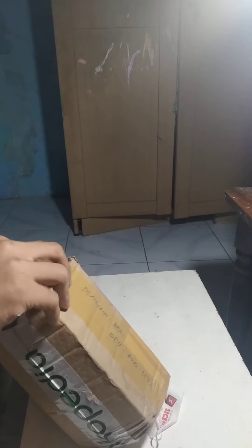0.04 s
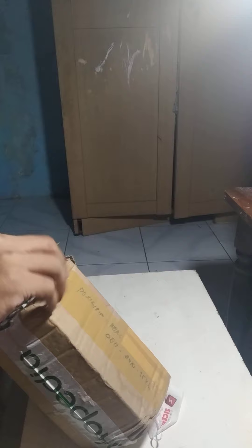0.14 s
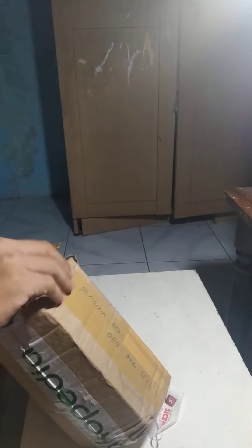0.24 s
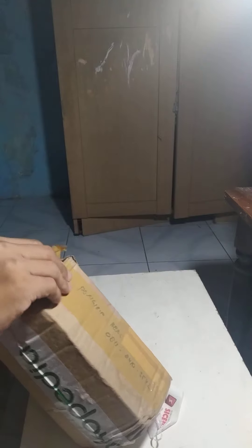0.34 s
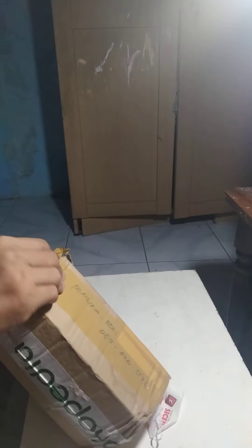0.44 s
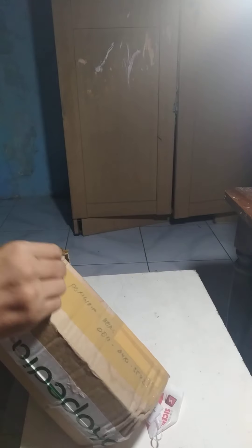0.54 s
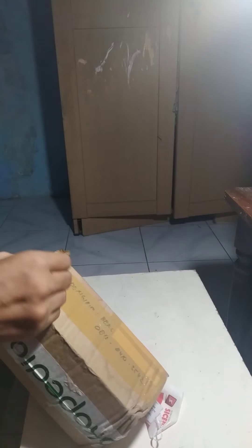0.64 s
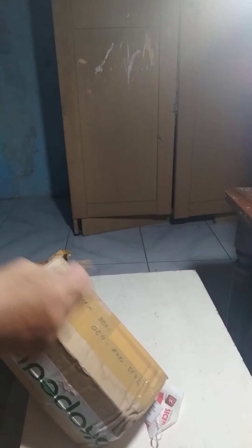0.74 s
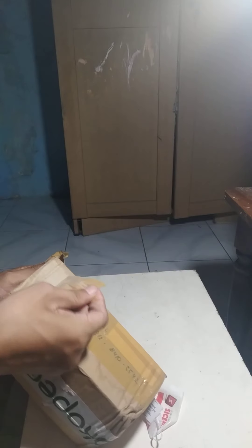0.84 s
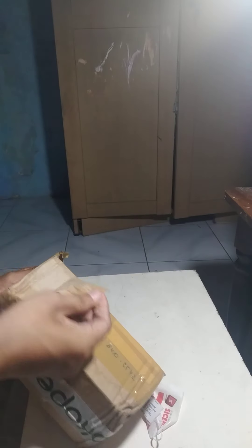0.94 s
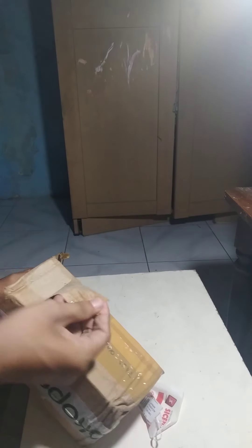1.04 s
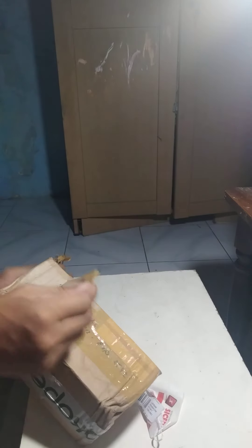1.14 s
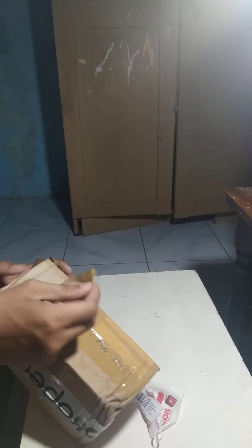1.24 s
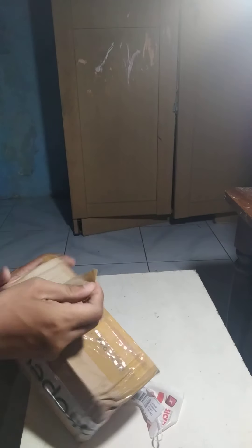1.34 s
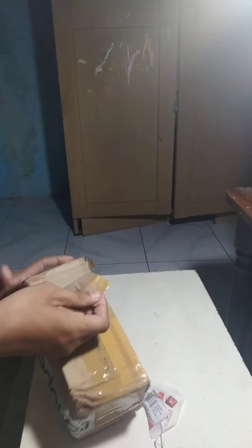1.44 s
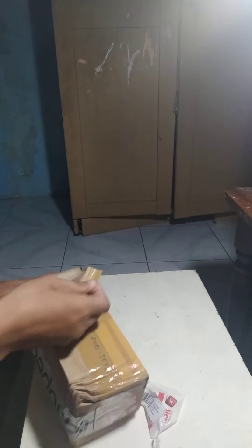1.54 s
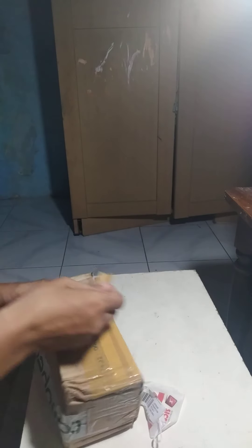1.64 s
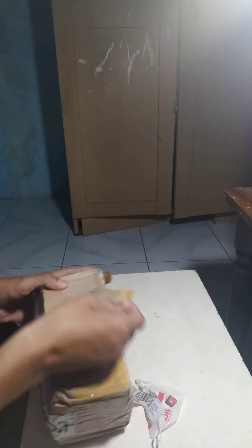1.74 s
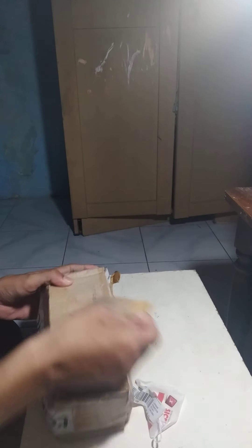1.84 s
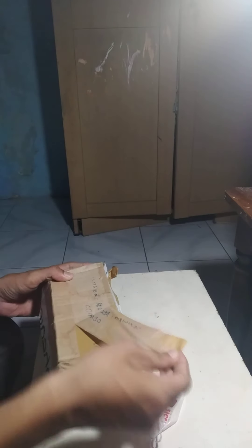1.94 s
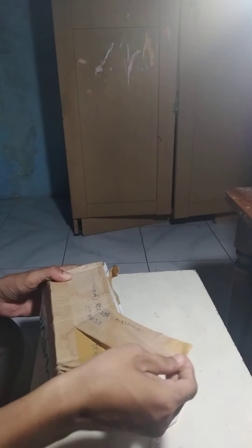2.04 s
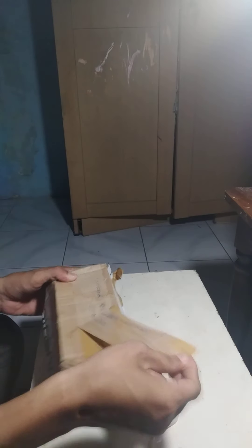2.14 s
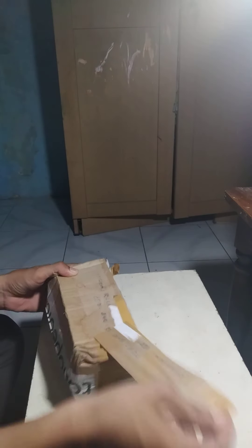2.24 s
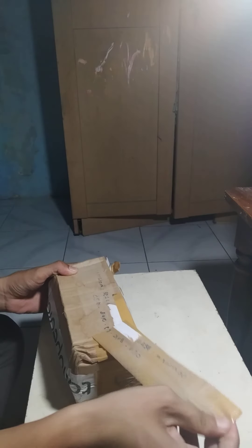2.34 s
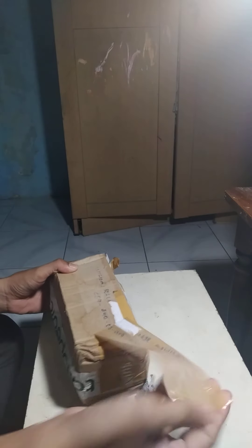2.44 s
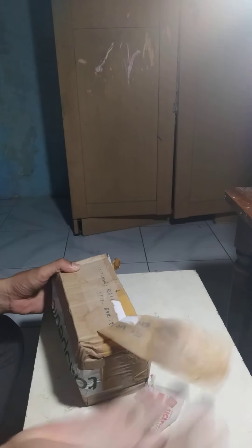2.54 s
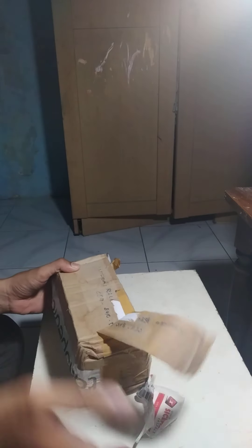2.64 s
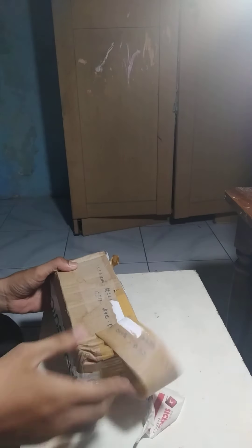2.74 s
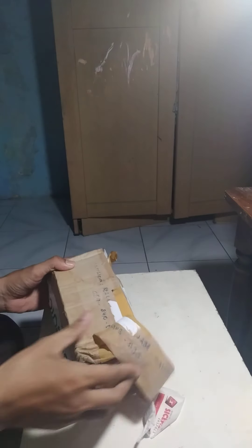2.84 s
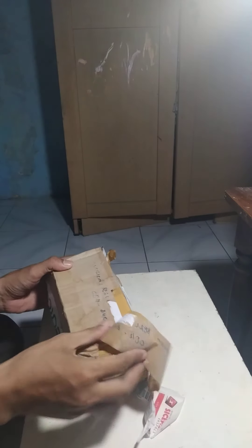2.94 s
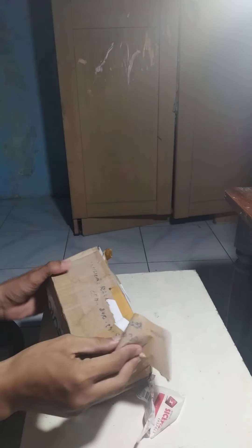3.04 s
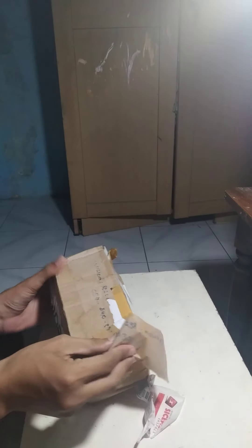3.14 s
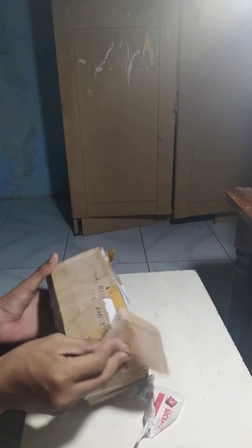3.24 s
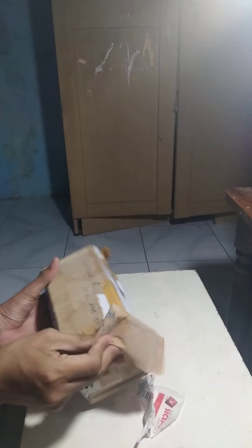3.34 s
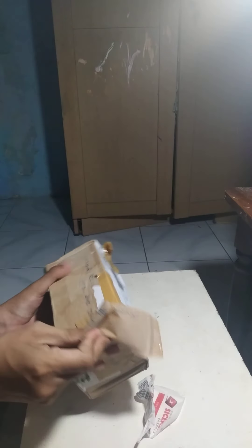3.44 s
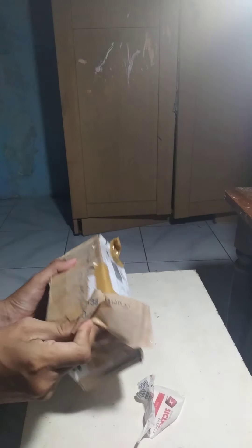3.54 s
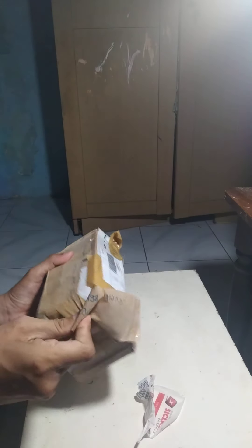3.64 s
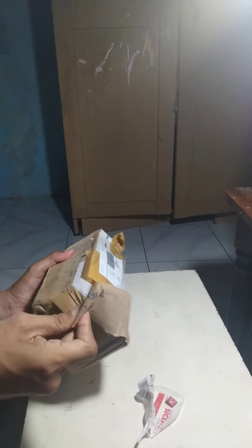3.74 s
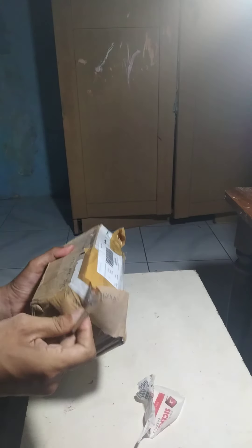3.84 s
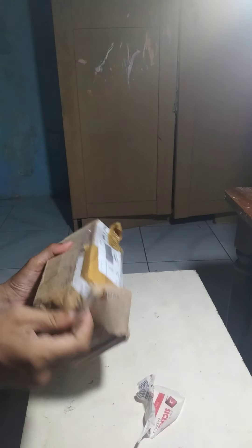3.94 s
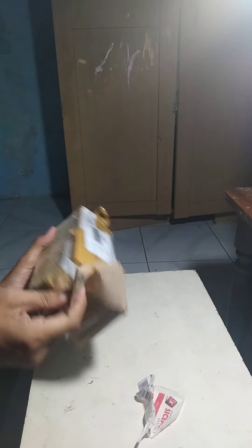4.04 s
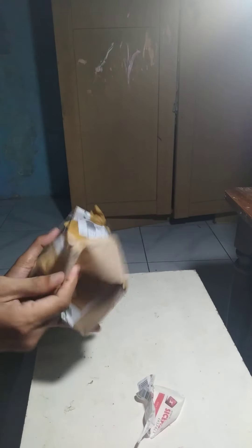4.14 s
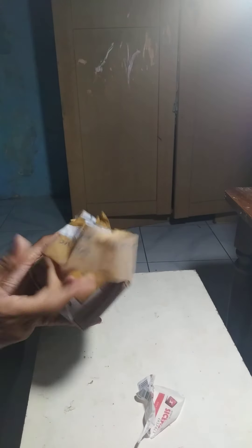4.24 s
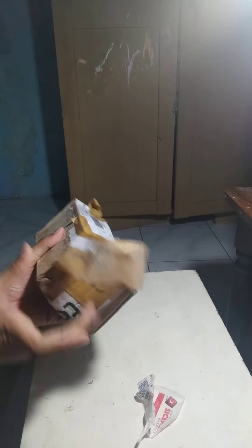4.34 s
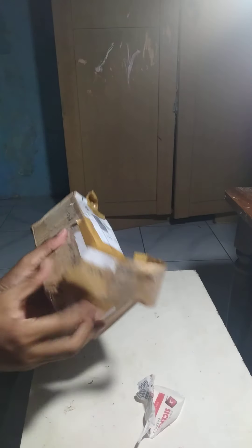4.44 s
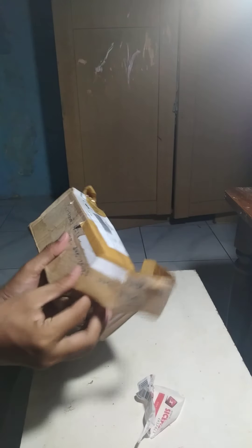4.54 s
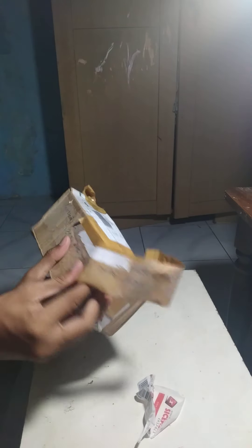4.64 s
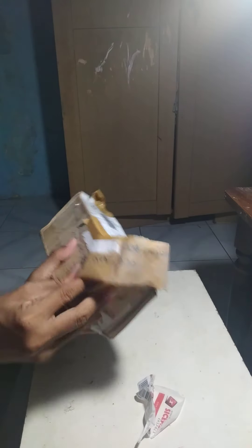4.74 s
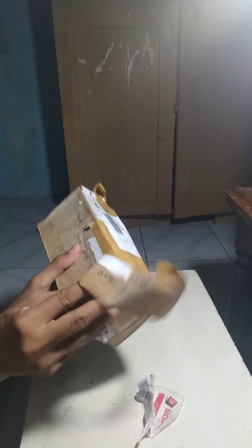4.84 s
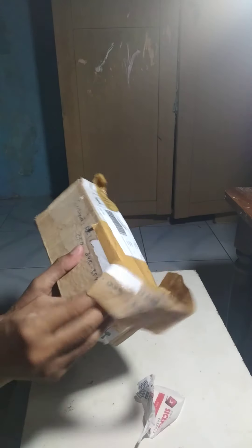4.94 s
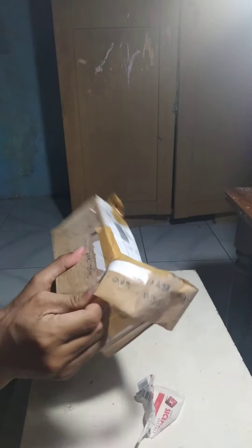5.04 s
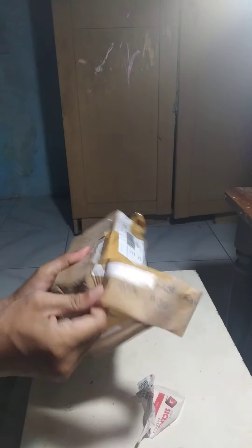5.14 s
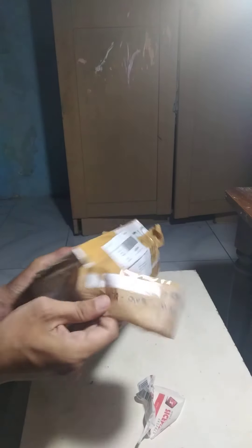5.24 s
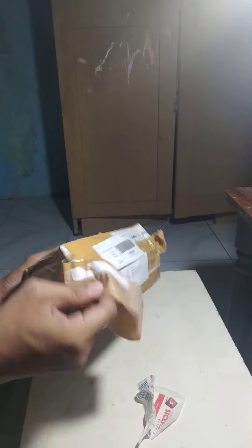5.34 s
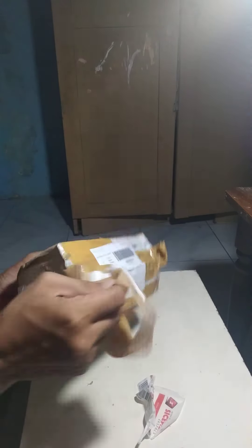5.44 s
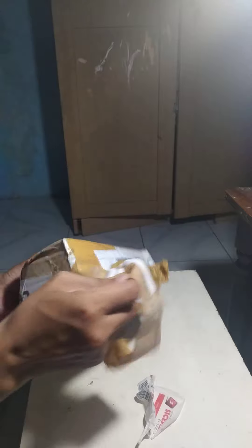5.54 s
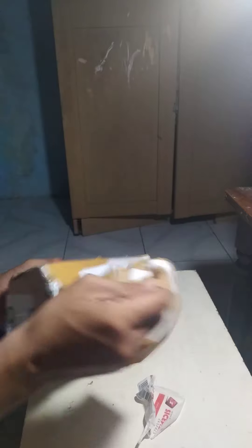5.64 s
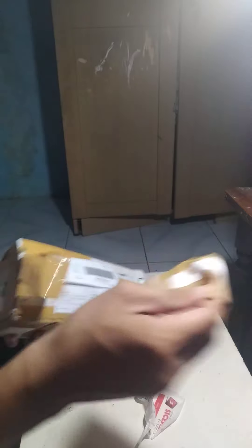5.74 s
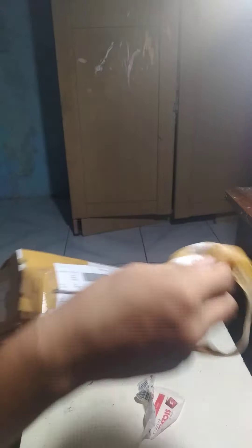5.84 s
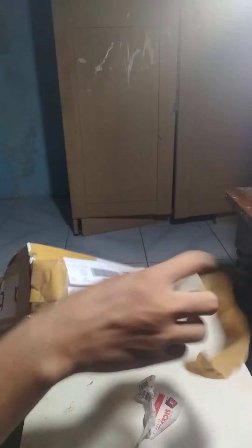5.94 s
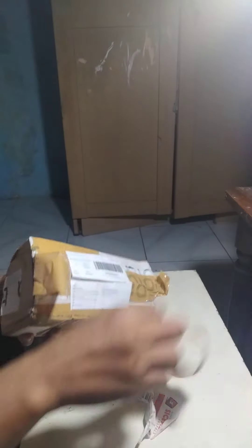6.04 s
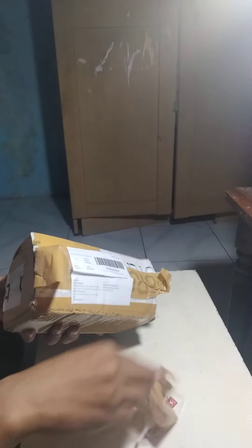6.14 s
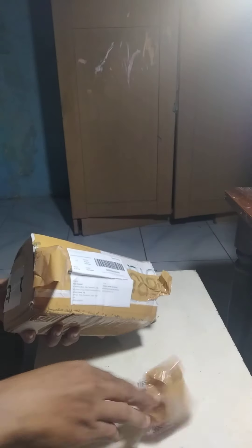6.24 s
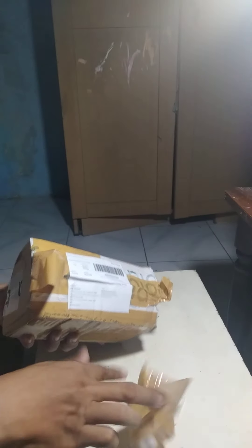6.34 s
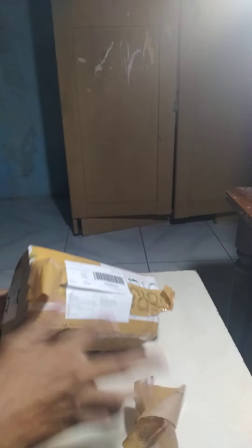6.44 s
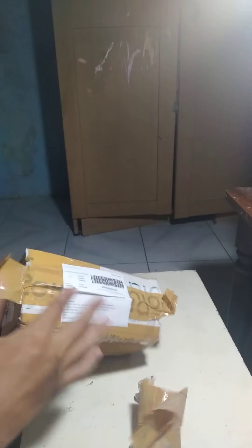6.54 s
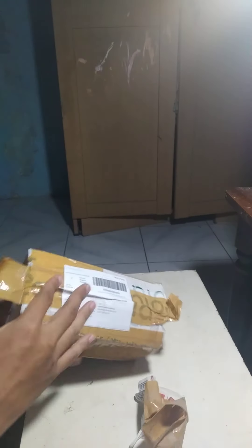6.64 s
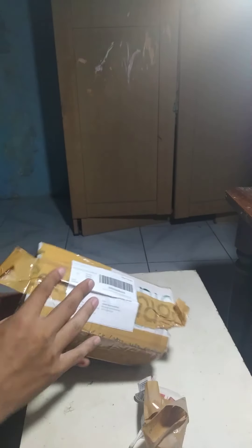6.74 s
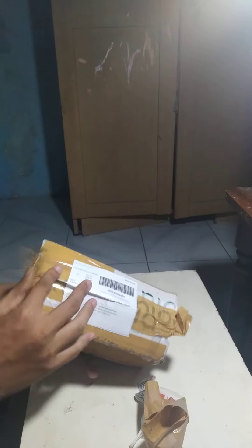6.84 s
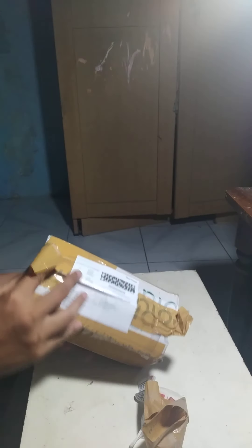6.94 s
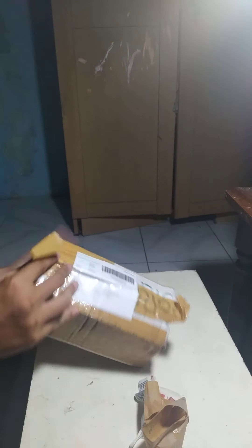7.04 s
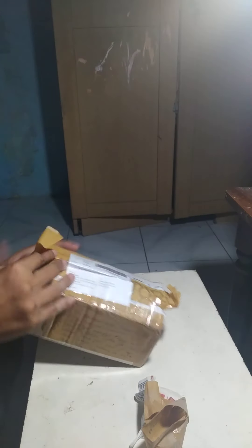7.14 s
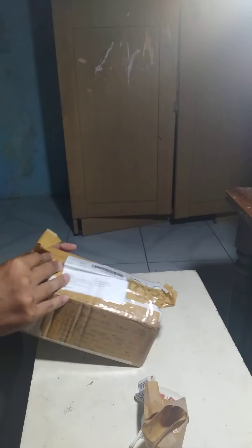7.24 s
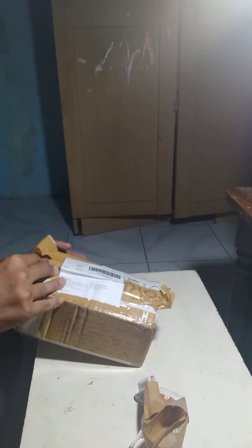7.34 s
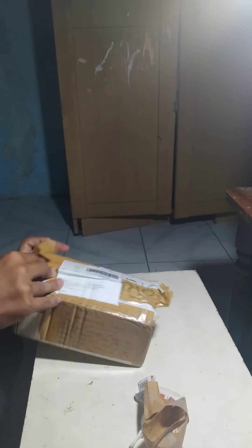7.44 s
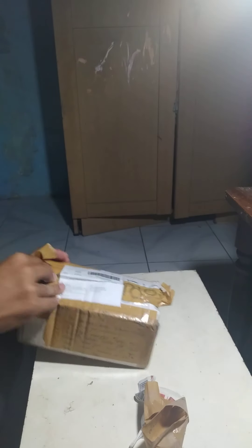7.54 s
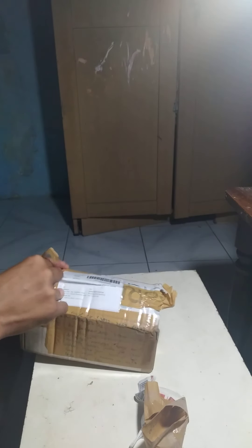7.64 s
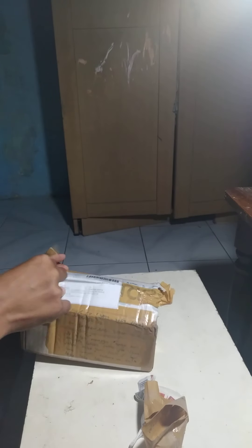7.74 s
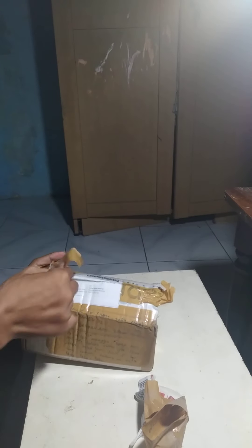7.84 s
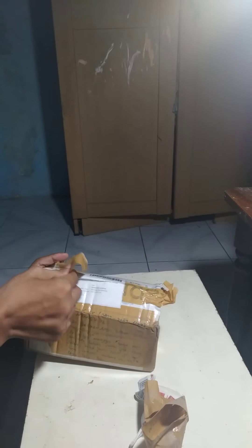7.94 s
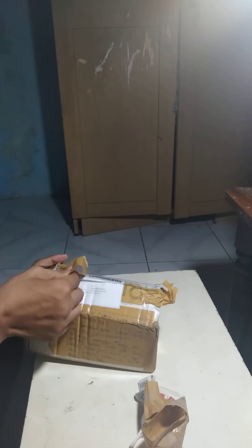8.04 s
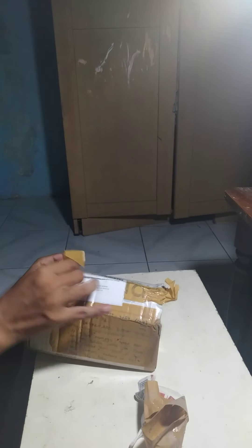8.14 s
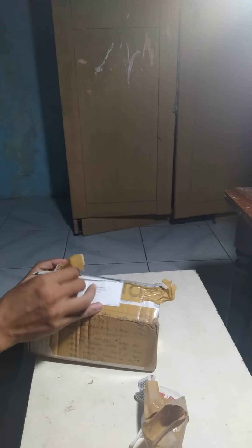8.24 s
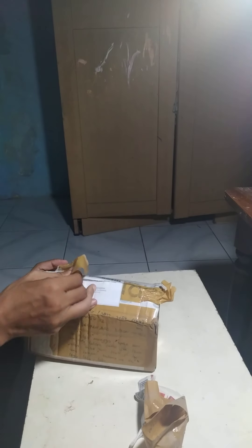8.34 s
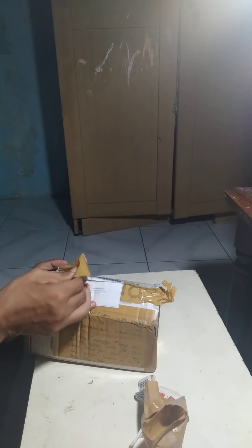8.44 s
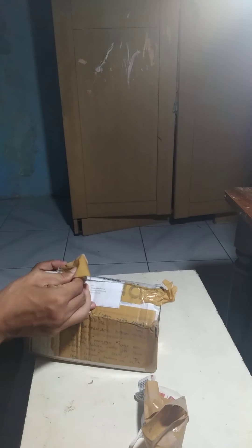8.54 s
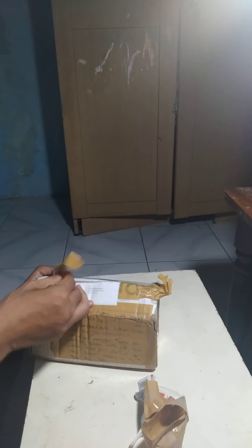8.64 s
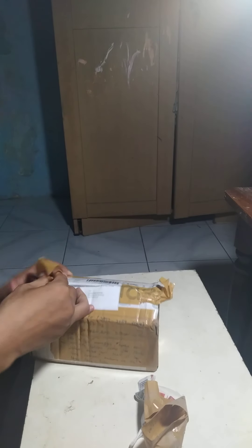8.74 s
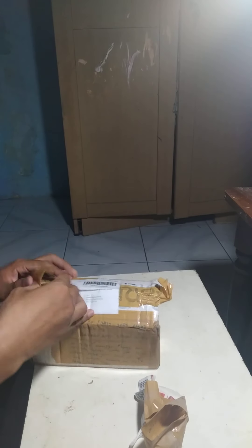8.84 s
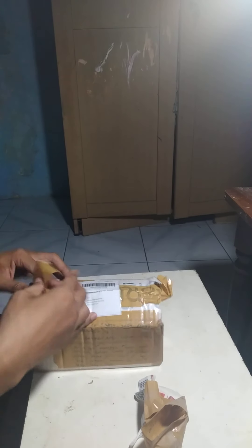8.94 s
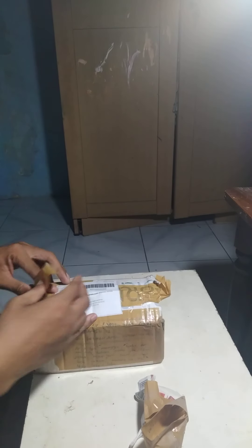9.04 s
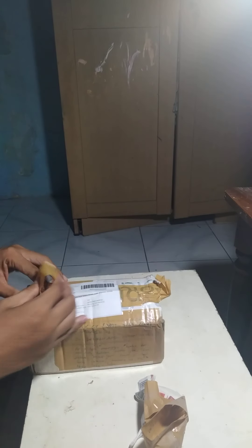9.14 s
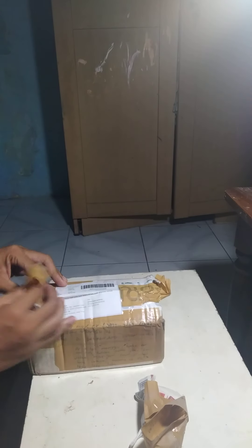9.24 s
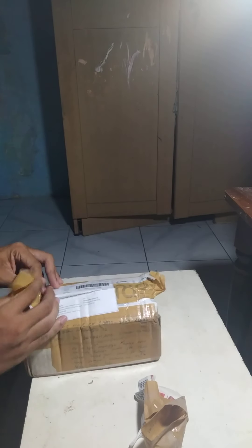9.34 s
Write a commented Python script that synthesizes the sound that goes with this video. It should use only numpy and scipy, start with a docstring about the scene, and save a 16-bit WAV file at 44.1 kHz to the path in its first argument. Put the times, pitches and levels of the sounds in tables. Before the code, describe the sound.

Close stereo phone pickup of tape peeling from a hollow box on a table. Three main bouts of dry, ragged ripping, the middle one loudest, are separated by soft skin rubs, plastic crinkles and fingertip knocks. Strong snaps crack brightly and kick the cardboard. Short room reflections, soft room noise and a faint wavering hum surround it.

```python
"""A fingertip knock on cardboard is heard first. Fingers rip packing tape off a box in several bouts,
knocking on it and fidgeting before, between and after. Place: a table in a small hard-walled room.
The glue gives way in quick uneven slips that crackle in the film and drum on the box; sudden snaps crack
in the film and kick the box, and jolts thud on the table. Noise bursts and impulses drive filters for box,
face and film, and the walls answer with decaying noise. Microphone: a phone with two ports, close by.
Soft room noise and a faint motor hum lie underneath."""
import sys
import numpy as np
from scipy import signal
from scipy.fft import rfft, irfft
from scipy.io import wavfile
from scipy.ndimage import uniform_filter1d

SR = 44100
rng = np.random.default_rng(int(sys.argv[2]) if len(sys.argv) > 2 else 0)


def wav_record(signal):
    """Record a signal, one row per channel, as 16-bit PCM in the file named by sys.argv[1]."""
    frames = np.transpose(np.atleast_2d(signal))
    bounded = np.clip(frames, -1, 1)
    # unit amplitude maps onto the largest positive 16-bit level
    quanta = np.round(bounded * 32767).astype(np.int16)
    wavfile.write(sys.argv[1], SR, quanta)


N = 414540
T = np.arange(N) / SR  # time [s]
TOP_HZ = 15800  # upper limit of the microphone


def undb(db):
    """Decibels to gain."""
    return 10 ** (np.asarray(db) / 20)


def unit(x):
    """Scale to rms 1."""
    return x / np.sqrt(np.mean(x ** 2))


def lookup(points, size):
    """Read (f/Hz, value) points at the bins of a transform, along a logarithmic frequency axis."""
    hz, value = np.transpose(points)
    return np.interp(np.log(np.fft.rfftfreq(size, 1 / SR) + 1), np.log(hz), value)


def colour(x, points):
    """Shape a sound by (f/Hz, level/dB) points."""
    return irfft(rfft(x) * undb(lookup(points, N)), N)


def response(points, size=2048):
    """Causal impulse response of unit energy with the given spectral shape."""
    # folding the cepstrum forward in time gives minimum phase
    cepstrum = irfft(np.log(undb(lookup(points, size))))
    cepstrum[1:size // 2] *= 2
    cepstrum[size // 2 + 1:] = 0
    h = irfft(np.exp(rfft(cepstrum)))
    return h / np.linalg.norm(h)


def ring(x, h):
    """Pass a sound through an impulse response."""
    return signal.oaconvolve(x, h)[:N]


def walk(rate):
    """Random wandering through `rate` new values per second."""
    return 0.94 * np.interp(T * rate, np.arange(N // 8), rng.standard_normal(N // 8))


def add(track, s, sound):
    """Mix a short sound in at time s."""
    i = max(int(s * SR), 0)
    track[i:i + len(sound)] += sound[:max(N - i, 0)]


# likeness of diffuse sound at the two ports: (f/Hz, likeness 0-1)
PORT_LIKENESS = [(60, 0.87), (300, 0.96), (650, 0.95), (1400, 0.7), (2400, 0)]


def diffuse(size):
    """Noise from all sides at two ports: alike in the bass, unrelated in the treble."""
    mid, side = rfft(rng.standard_normal((2, size)))
    alike = np.clip(lookup(PORT_LIKENESS, size), -.99, .99)
    mid = mid * np.sqrt((1 + alike) / 2)
    side = side * np.sqrt((1 - alike) / 2)
    return irfft([mid + side, mid - side], size)


# pulls on the tape, levels before the part gains:
# (start t/s, rise t/s, hold t/s, hollow box level/dB, cardboard face level/dB, film level/dB)
TAPE_PULLS = [(0.828, 0.018, 0.17, -30.5, -24.5, -25), (1.051, 0.04, 0.0091, -32.5, -29.5, -31.5),
              (1.335, 0.019, 0.016, -37.5, -38.5, -28.5), (1.46, 0.027, 0.023, -39, -35, -42),
              (1.751, 0.058, 0.025, -34.5, -35.5, -31), (1.918, 0.081, 0.056, -24, -25.5, -23),
              (2.266, 0.053, 0.05, -28, -27, -22), (5.056, 0.028, 0.029, -29.5, -35, -28.5),
              (5.131, 0.0093, 0.04, -41.5, -39, -34), (5.236, 0.052, 0.14, -30, -26.5, -23),
              (5.467, 0.053, 0.024, -31.5, -33.5, -30), (5.632, 0.039, 0.036, -28.5, -29.5, -29),
              (5.708, .03, 0.078, -28.5, -42, -23.5), (5.795, 0.0036, 0.067, -36, -29.5, -30.5),
              (6.199, 0.068, 0.0844, -47, -44, -34), (7.69, 0.0167, 0.042, -39, -49, -30.5),
              (7.745, 0.0054, 0.073, -38, -34, -23.5), (7.883, .016, 0.096, -51.5, -39, -22),
              (7.999, 0.019, 0.067, -42.5, -40.5, -32), (8.142, 0.0082, 0.042, -46.5, -48, -40.5),
              (8.214, 0.011, 0.043, -42, -45, -28.5)]
# a pull starts with slack (share of full tension), eases as the tape peels, then lets go
SLACK_SHARE, SAG_DB_PER_S, RELEASE_DB_PER_S = .18, 55.5, 358


def pulling():
    """Gains of box, face and film: each pull rises, sags while the tape peels, and dies away."""
    gains = np.zeros((3, N))
    t = T[:SR // 2]
    for s, rise, hold, *levels in TAPE_PULLS:
        tension = np.interp(t, [0, rise], [SLACK_SHARE, 1])
        sag_db = SAG_DB_PER_S * np.clip(t - rise, 0, hold)
        release_db = RELEASE_DB_PER_S * np.maximum(t - rise - hold, 0)
        for gain, db in zip(gains, levels):
            # overlapping pulls add as power
            add(gain, s, (tension * undb(db - sag_db - release_db)) ** 2)
    return np.sqrt(gains)


def slips(rate, scatter_db, clump_db, clump_rate):
    """Tiny releases at random moments, uneven in size and bunched in clumps, levelled to about rms 1."""
    happens = rng.random(N) < rate / SR
    scatter = scatter_db * np.clip(rng.standard_normal(N), -2, 2)
    sizes = undb(scatter + clump_db * walk(clump_rate))
    train = happens * sizes * rng.choice([-1, 1], N)
    # the hand sets the mean power (over 30 ms), whatever the single slips do
    power = np.abs(uniform_filter1d(train ** 2, size=1323))
    return train / np.sqrt(power + 1e-3)


def crackle(train, ring_s, size=64):
    """Each slip flicks another facet of the film, which answers with a brief noisy ring of its own."""
    at = np.flatnonzero(train)
    rings = rng.standard_normal((len(at), size)) * np.exp(-np.arange(size) / SR / ring_s)
    rings *= train[at, None] / np.linalg.norm(rings, axis=1, keepdims=True)
    samples = at[:, None] + np.arange(size)
    return np.bincount(samples.ravel(), rings.ravel(), N)[:N]


def resonate(train, rows, ring_s, drift):
    """The slips push one resonance per (t, length, f, level) row; its pitch drifts in octaves per second."""
    out = np.zeros(N)
    t = T[:SR // 4]
    for s, length, hz, db in rows:
        swell = np.sqrt(np.clip(np.sin(np.pi * np.minimum(t / length, 1)), 0, 1))
        push = train[int(s * SR):][:len(t)] * swell
        turn = np.exp(2j * np.pi * np.cumsum(hz * 2 ** (drift * (t - length / 2))) / SR)
        # a decay in the rotating frame rings at the drifting pitch
        swing = signal.lfilter([1], [1, -np.exp(-1 / (ring_s * SR))], push / turn) * turn
        add(out, s, undb(db) * swing.real * 2 / np.sqrt(ring_s * SR))
    return out


# the taut strip sings under the slips: (t/s, length t/s, mid-length f/Hz, drive level/dB)
STRIP_NOTES = [(0.88, 0.091, 2070, -38), (1.344, 0.023, 2160, -36), (2, 0.13, 1420, -50),
               (2.304, 0.052, 2672, -31.5), (5.256, .15, 1466, -38.5), (5.714, .014, 1390, -24),
               (5.715, 0.0098, 2130, -27), (5.758, 0.094, 1290, -40), (7.732, 0.07, 2170, -41),
               (8.216, 0.059, 1654, -45)]
# the cardboard under the peel drums at a pitch set by where the tape lets go:
# (t/s, length t/s, mid-length f/Hz, drive level/dB)
PANEL_NOTES = [(0.884, 0.082, 680, -36.5), (1.94, 0.12, 364, -47), (1.97, 0.073, 420, -33.5),
               (1.996, 0.052, 782, -37), (2.036, 0.057, 625, -34.5), (2.268, 0.047, 440, -36),
               (2.307, 0.087, 540, -39), (5.072, 0.045, 920, -34), (5.252, 0.15, 850, -41),
               (5.642, 0.043, 430, -47)]
STRIP_RING_S, PANEL_RING_S = .005, .0045  # decay time constants after a slip
STRIP_DRIFT_OCTAVES_PER_S, PANEL_DRIFT_OCTAVES_PER_S = 0.47, -0.29  # the strip stretches under the pull


def ripping(box_db=-0.5, face_db=-3, film_db=0.0):
    """Glue strands break faster and in rougher clumps under a harder pull; the same slips drive every part."""
    box, face, film = pulling()
    pull = film / film.max()
    train = slips(1000 + 800 * pull, scatter_db=4.5, clump_db=2 + 2.2 * pull, clump_rate=200)
    strip_song = resonate(train, STRIP_NOTES, ring_s=STRIP_RING_S, drift=STRIP_DRIFT_OCTAVES_PER_S)
    panel_song = resonate(train, PANEL_NOTES, ring_s=PANEL_RING_S, drift=PANEL_DRIFT_OCTAVES_PER_S)
    box_drive = undb(box_db) * box * train
    face_drive = undb(face_db) * face * train
    film_drive = undb(film_db) * film * crackle(train, ring_s=0.00095)
    return np.array([box_drive, face_drive, film_drive]), strip_song + panel_song


# the tape snaps free or buckles, or a fingertip knocks hard on the box; levels before the part gains: # (t/s,
# film level/dB, hollow box level/dB, cardboard face level/dB)
SNAPS_AND_HARD_KNOCKS = [(.155, -27.5, -49.5, -51), (.32, -28.5, -64, -68), (0.386, -30, -49, -60),
                         (0.653, -27, -36, -40), (0.7615, -24, -24.5, -28), (0.8344, -13, -20.5, -16),
                         (0.837, -15, -31, -23), (.876, -7.5, -37, -19.5), (.957, -21, -27.5, -29),
                         (0.989, -25, -34, -26), (1.0733, -27, -42, -45), (1.3166, -36, -55, -56),
                         (1.3327, -26, -55, -53), (1.3527, -10.5, -39, -48), (1.529, -21.5, -41, -38),
                         (1.6714, -28.5, -49, -47), (1.7929, -28, -33, -38), (1.946, -33, -25.5, -41),
                         (1.969, -17, -26, -22), (2.018, -13, -25, -27), (2.2719, -6, -21.5, -26),
                         (2.319, -6, -31, -29), (2.5645, -24, -46, -47), (2.681, -40, -56, -48),
                         (2.878, -37, -67, -64), (3.002, -37.5, -63, -62), (3.3204, -28, -40.5, -49),
                         (3.362, -21, -42, -44), (3.394, -22.5, -43, -42.5), (3.412, -29, -51, -54),
                         (3.494, -27.5, -47, -49), (3.631, -34, -50, -57), (3.782, -27, -50, -52),
                         (3.8354, -33, -53, -58), (3.872, -22.5, -25, -24.5), (4.1973, -28, -54, -56),
                         (4.277, -22.5, -38, -36), (4.297, -29.5, -45, -51), (4.357, -33, -55, -48),
                         (4.601, -47, -55, -54), (4.8005, -23, -47, -62), (4.9274, -40, -65, -60),
                         (4.96, -34, -61, -54), (5.016, -33, -62, -56), (5.0441, -33, -59, -52),
                         (5.0619, -38, -40, -33), (5.1236, -6, -30, -20), (5.2345, -33, -22.5, -21.5),
                         (5.253, -8.5, -28, -20.5), (5.279, -3.5, -22, -22), (5.309, -4.5, -33, -25),
                         (5.343, -5.5, -38, -20.5), (5.3512, -3.5, -23, -27), (5.358, -9, -37, -29.5),
                         (5.3668, -13, -42, -21.5), (5.392, -14, -25, -23.5), (5.42, -12, -41, -25.5),
                         (5.7158, -1.5, -13.5, -13.5), (5.7235, -8, -22, -19.5), (5.7709, -5, -17, -16.5),
                         (5.7898, -8, -32, -19.5), (5.8697, -34, -23.5, -33), (6.02, -30, -65, -52),
                         (6.088, -26.5, -56, -53), (6.2687, -16, -47, -38.5), (6.291, -27, -43, -47),
                         (6.335, -18, -41, -33), (6.353, -22, -46, -39), (6.532, -41, -63, -62),
                         (6.581, -41, -60, -60), (6.9602, -27.5, -41, -47), (7.15, -26.5, -57, -65),
                         (7.201, -19, -48, -44), (7.4561, -24, -55, -52), (7.6945, -7, -27, -28.5),
                         (7.7034, -8.5, -42, -32), (7.743, 0.5, -38, -39), (7.747, -8, -24, -22),
                         (7.8808, 0, -25, -23), (7.896, -12, -37, -39), (7.93, -3.5, -31.5, -31),
                         (7.9633, -4.5, -27, -24.5), (8.043, -11, -45, -34), (8.073, -11.5, -46, -45),
                         (8.108, -15, -40, -51.5), (8.147, -12.5, -42, -54), (8.2158, -4, -27.5, -26.5),
                         (8.269, -15, -42, -37), (8.416, -36, -56, -56), (8.439, -21.5, -54, -56),
                         (8.576, -24, -56, -58), (8.748, -24, -46, -50), (8.7627, -35, -32.5, -41),
                         (8.8449, -27.5, -44, -54), (8.881, -31, -49.5, -55), (9.076, -42.5, -53, -53),
                         (9.3674, -36, -51, -50)]
# time scale of the break across the tape, and how much a snap at 0 dB film level adds to it
SNAP_S, SNAP_GROWTH_S = 0.0028, 0.0012
SNAP_HZ, SNAP_SPREAD_OCTAVES = 5770, 0.33  # each break flicks the film near this pitch
# a hard snap also plucks the taut strip: centre, width, and lift at 0 dB film level
PLUCK_HZ, PLUCK_WIDTH_HZ, PLUCK_DB = 2250, 480, 7.5


def snaps(box_db=23, face_db=23, film_db=0.0, ring_db=3, ring_width_hz=1400, flutter=0.056,
          crack_db=6.0, evenness=0.52):
    """A sudden release or hard knock kicks box and face while the film cracks over a wide band; a hard one
    plucks the strip."""
    box, face, film = np.zeros((3, N))
    t = T[:512] - T[32]
    bins = np.fft.rfftfreq(len(t), 1 / SR)
    for s, peak_db, hollow_db, card_db in SNAPS_AND_HARD_KNOCKS:
        # the break runs across the tape for a few milliseconds, longer for a strong one
        burst = (t >= 0) * np.exp(-(t / (SNAP_S + SNAP_GROWTH_S * undb(peak_db))) ** 2)
        hz = SNAP_HZ * 2 ** (SNAP_SPREAD_OCTAVES * rng.standard_normal())
        chatter = rng.choice([-1, 1], (2, len(t))) * burst
        kick = (t == 0) + flutter * chatter[0]
        kick = kick / np.linalg.norm(kick)
        facet = ring_db * np.exp(-((bins - hz) / ring_width_hz) ** 2)
        pluck = PLUCK_DB * undb(peak_db) * np.exp(-((bins - PLUCK_HZ) / PLUCK_WIDTH_HZ) ** 2)
        tilt = crack_db * bins / TOP_HZ
        # partly levelling the spectrum spreads the crack evenly over the band
        crack = rfft(chatter[1])
        flick = irfft(crack / np.abs(crack) ** evenness * undb(facet + pluck + tilt))
        flick = flick * np.linalg.norm(burst) / np.linalg.norm(flick) / 2
        start = s + t[0]
        add(box, start, undb(hollow_db + box_db) * kick)
        add(face, start, undb(card_db + face_db) * kick)
        add(film, start, undb(peak_db + film_db) * flick)
    return np.array([box, face, film])


# fingers shift their grip or fold the loose tape, levels before the part gains:
# (start t/s, length t/s, box and face level/dB, film level/dB)
FINGER_TOUCHES = [(0.163, 0.069, -51, -52.5), (0.315, 0.38, -56, -55.5), (0.633, 0.028, -35.5, -36),
                  (0.753, 0.052, -35, -40), (1.196, 0.067, -40, -46.5), (1.29, 0.06, -42, -40),
                  (1.585, 0.12, -49.5, -58), (1.66, 0.17, -48, -45), (2.424, 0.15, -43.5, -48.5),
                  (2.58, 0.042, -36.5, -38.5), (2.987, 0.27, -55, -60.5), (3.111, 0.047, -38, -42.5),
                  (3.3, 0.29, -57.5, -56.5), (3.598, 0.11, -46, -45.5), (3.733, 0.12, -49, -47),
                  (3.87, 0.032, -35, -48), (4.017, 0.14, -56, -60.5), (4.167, 0.098, -49.5, -54),
                  (4.256, 0.03, -36, -37.5), (4.325, 0.062, -47.5, -53.5), (4.588, 0.22, -56, -69),
                  (4.725, 0.13, -48.5, -60), (4.89, 0.25, -51, -60), (5.902, 0.11, -49, -61),
                  (6.092, 0.031, -48, -57), (6.553, 0.36, -65, -79), (6.92, 0.36, -53, -59),
                  (7.166, 0.25, -56, -62), (7.444, 0.058, -45, -43), (7.526, 0.21, -48.5, -55.5),
                  (8.39, 0.095, -47.5, -50), (8.58, 0.033, -48, -49), (8.704, 0.12, -44, -47.5),
                  (8.861, 0.054, -46, -44), (8.96, 0.11, -50.5, -56), (9.204, 0.16, -62, -69),
                  (9.385, .05, -27, -29.5)]
# the fingers lift off for a moment and the fidgeting stops: (middle t/s, length t/s)
FINGER_RESTS = [(2.797, 0.15), (3.277, 0.065), (4.52, 0.18), (6.479, 0.096), (9.188, 0.064)]
TOUCH_ATTACK_S, TOUCH_RISE_SHARE, TOUCH_RELEASE_S = 0.016, 0.11, 0.012
# between grips the hands seldom rest: levels before the part gains, and their slow spread
FIDGET_BOX_DB, FIDGET_FILM_DB, FIDGET_SPREAD_DB = -61.5, -67, 3


def touching():
    """Gains of box and film: touches swell, the longer the slower, and die away over a faint fidgeting."""
    busy = np.prod([1 - np.exp(-((T - s) / (length / 2)) ** 2) for s, length in FINGER_RESTS], axis=0)
    gains = undb([[FIDGET_BOX_DB], [FIDGET_FILM_DB]]) * undb(FIDGET_SPREAD_DB * walk(12)) * busy
    t = T[:SR // 2]
    for s, length, *levels in FINGER_TOUCHES:
        swell = np.minimum(t / (TOUCH_ATTACK_S + TOUCH_RISE_SHARE * length), 1)
        press = swell / (1 + np.exp(np.minimum((t - length) / TOUCH_RELEASE_S, 20)))
        for gain, db in zip(gains, levels):
            add(gain, s, undb(db) * press)
    return gains


def handling(box_db=-7.5, face_db=-9, film_db=-1.5, rub_db=-7.0):
    """Sparse crinkles of loose tape over the fine rub of skin on cardboard."""
    box, film = touching()
    crinkles = slips(170, scatter_db=4.0, clump_db=2, clump_rate=120)
    rub = undb(rub_db) * rng.standard_normal(N)
    touch = crinkles + rub
    rustle = crackle(crinkles, ring_s=0.0007) + rub
    return np.array([undb(box_db) * box * touch, undb(face_db) * box * touch, undb(film_db) * film * rustle])


# fingertips knock on the box, levels before the part gains: (t/s, level/dB)
FINGER_KNOCKS = [(.005, -47), (.226, -44.5), (1.214, -44), (3.666, -50), (4.391, -39.5), (4.76, -40),
                 (4.893, -46), (6.385, -40.5), (7.29, -39), (8.731, -39), (8.929, -45)]


def knocks(box_db=22, face_db=14, contact_s=0.004):
    """A fingertip meets the cardboard: a short decaying noise burst that leaves the film alone."""
    out, t = np.zeros(N), T[:SR // 10]
    for s, db in FINGER_KNOCKS:
        contact = rng.standard_normal(len(t)) * np.exp(-t / contact_s)
        add(out, s, undb(db) * contact / np.linalg.norm(contact))
    return np.array([undb(box_db) * out, undb(face_db) * out, np.zeros(N)])


# the box jolts against the table, levels scaling all modes: (t/s, level/dB)
TABLE_JOLTS = [(0.835, -22), (.957, -27), (2.271, -34), (5.738, -7.5), (5.791, -23.5), (7.745, -24.5),
               (7.883, -24), (8.217, -32)]
# what a jolt rings with, before the low cut: (f/Hz, level/dB, time to fall 60 dB t/s)
TABLE_MODES = [(138.7, -20.5, 0.4), (191, -20.5, 0.18), (280, -7.5, 0.021), (420, -12, 0.026)]


def jolts(low_cut_hz=112):
    """The box thuds on the table top: decaying sines that boom on briefly, with little deep bass."""
    out, t = np.zeros(N), T[:SR // 2]
    thud = np.zeros(len(t))
    for hz, db, t60 in TABLE_MODES:
        thud += undb(db) * np.sin(2 * np.pi * hz * t) * undb(-60 * t / t60)
    for s, db in TABLE_JOLTS:
        add(out, s, undb(db) * thud)
    return signal.sosfilt(signal.butter(4, low_cut_hz, "high", fs=SR, output="sos"), out)


# spectral shapes of the three radiating parts, each scaled to unit energy: (f/Hz, relative level/dB)
# the hollow box
BOX_COLOUR = [(30, -83), (70, -42), (110, -19.5), (210, -16), (280, -2.5), (340, -3), (480, 0), (600, -1),
              (760, -2), (1000, -4.5), (1800, -31.5)]
# the cardboard face
FACE_COLOUR = [(40, -73), (200, -36.5), (550, 3.5), (800, 8), (1050, 9), (1400, 2), (1800, -1),
               (2250, -6.5), (3000, -5.5), (4200, -17.5), (9000, -18.5)]
# the tape film
FILM_COLOUR = [(60, -28.5), (500, -32.5), (1500, -12), (2300, -5), (3300, -10.5), (4100, -1.5), (5500, -3),
               (7500, -4), (10000, -0.5), (15500, -19)]


def radiate(forces):
    """Hollow box, cardboard face and film each sound with their own colour."""
    parts = (BOX_COLOUR, FACE_COLOUR, FILM_COLOUR)
    return sum(ring(force, response(part)) for force, part in zip(forces, parts))


ROOM_T60_S, ROOM_DB = 0.18, 1.95
# the table reflects weakly at once (share of the full echo), the walls answer after ROOM_BUILD_S
TABLE_SHARE, ROOM_BUILD_S = .42, .0115


def walls(x, size=12288, count=4096):
    """Decaying noise as the room's answer at both ports; its pattern crossfades as hands and box move."""
    t = T[:size]
    swell = TABLE_SHARE + (1 - TABLE_SHARE) * (1 - np.exp(-(t / ROOM_BUILD_S) ** 8))
    envelope = swell * undb(-60 * t / ROOM_T60_S)
    fade = signal.windows.cosine(count)
    out = np.zeros((2, N))
    for i in range(0, N, count // 2):
        tails = diffuse(size) * envelope * undb(ROOM_DB) / np.linalg.norm(envelope)
        piece = x[i:i + count] * fade[:N - i]
        for port, tail in zip(out, tails):
            add(port, i / SR, signal.fftconvolve(piece, tail))
    return out


# left minus right, before `depth` and SIDE_SHARE: quiet sounds lie to the right,
# pulls harder than CENTRE_ABOVE_DB near the middle
QUIET_SIDE_DB, LOUD_SIDE_DB, CENTRE_ABOVE_DB, CENTRE_SMOOTH_S = -14.5, 3, -26, 0.12


def place(lag_s=0.017):
    """Moving side of the whole sound, left minus right: the harder the pull, the nearer the middle."""
    power = np.abs(uniform_filter1d(pulling()[2] ** 2, int(CENTRE_SMOOTH_S * SR)))
    power = np.interp(T - lag_s, T, power)
    loudness = power / (power + undb(CENTRE_ABOVE_DB) ** 2)
    return QUIET_SIDE_DB + (LOUD_SIDE_DB - QUIET_SIDE_DB) * loudness


# fixed lean between the ports: (f/Hz, left minus right level/dB)
PORT_BALANCE = [(100, 0), (250, 8), (600, 10.5), (1300, 5.5), (2400, 3.5)]
# how much of the moving side each pitch gets: (f/Hz, share)
SIDE_SHARE = [(700, 1.2), (1500, 1.29), (4400, 1.37), (7500, 1.7), (11000, 0.59)]


def shade(ports, depth=0.69):
    """A fixed lean lifts low and middle pitches on the left; the whole sound's side moves with the pull."""
    lean = lookup(PORT_BALANCE, N) / 2
    spectra = rfft(ports) * undb([lean, -lean])
    side_db = depth * place()
    movable = irfft(spectra * lookup(SIDE_SHARE, N), N)
    return irfft(spectra, N) + movable * (undb([side_db / 2, -side_db / 2]) - 1)


# spectral shape of the room noise: (f/Hz, relative level/dB)
AIR_COLOUR = [(18, -82), (30, -40.5), (129, -6.5), (253, -12), (310, 0.5), (364, -17), (460, -9),
              (774, -15), (1270, -16), (1480, -19.5), (3230, -26), (3590, -32), (7240, -29.5), (8470, -68),
              (15000, -94)]
# hum lines, rms levels before hum_db and the waver: (f/Hz, level/dB)
HUM_LINES = [(200, -72.5), (289.2, -72), (300.3, -64), (311.4, -73.5), (333.2, -68.5), (489.5, -70.5)]


def background(air_db=-55.0, hum_db=1.0, waver_db=-2.1, wander=0.38):
    """Soft room noise and the faint hum of a motor, whose close tones beat about eleven times a second."""
    air = unit(colour(diffuse(N), AIR_COLOUR)) * undb(air_db + 0.19 * walk(1.35))
    hum = np.zeros(N)
    for hz, db in HUM_LINES:
        strength = np.sqrt(2) * undb(db + waver_db * walk(3.26))
        hum += strength * np.sin(2 * np.pi * hz * T + wander * walk(4.9))
    return air + undb(hum_db) * hum


# the phone's treble step: (f/Hz, level/dB)
PHONE_TREBLE = [(7800, 0), (8300, -22.5), (15000, -21)]
PORT_LAG_S = .00016


def scene(snap_room_db=-3.0):
    """The parcel sounds directly, right port first, and through the room; snaps and knocks are a little drier."""
    pulls, song = ripping()
    tearing = radiate(pulls + handling()) + song
    snapping = radiate(snaps() + knocks())
    near = tearing + snapping
    direct = np.array([np.roll(near, int(PORT_LAG_S * SR)), near])
    ports = direct + walls(tearing + undb(snap_room_db) * snapping)
    return colour(shade(ports), PHONE_TREBLE) + jolts() + background()


def record(dry):
    """A soft limit keeps the peaks below full scale, and a low-pass cuts the top."""
    limited = np.tanh(dry)
    return signal.sosfilt(signal.ellip(8, .2, 70, TOP_HZ, fs=SR, output="sos"), limited)


dry = scene()
out = record(dry)
wav_record(out)
```